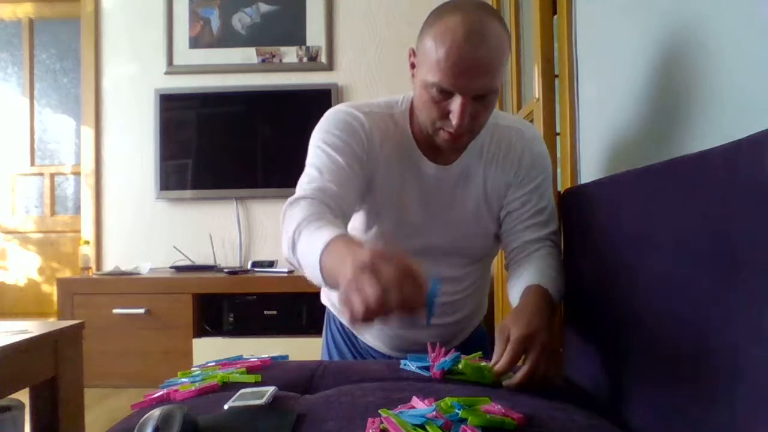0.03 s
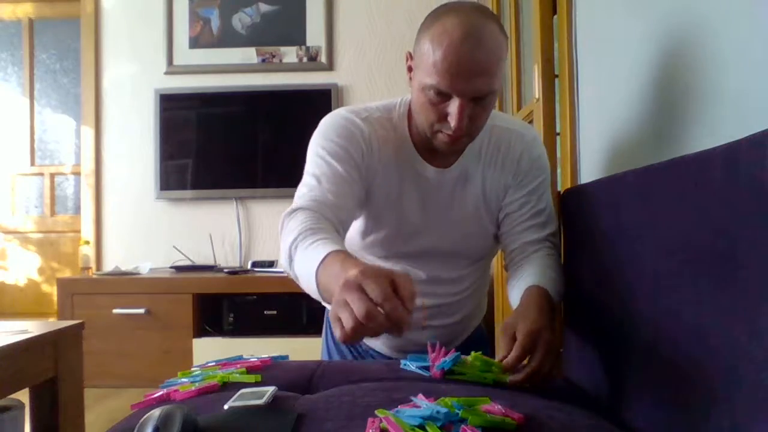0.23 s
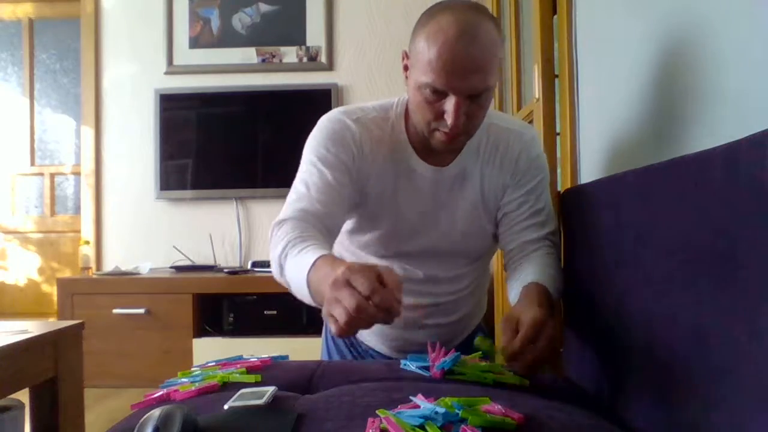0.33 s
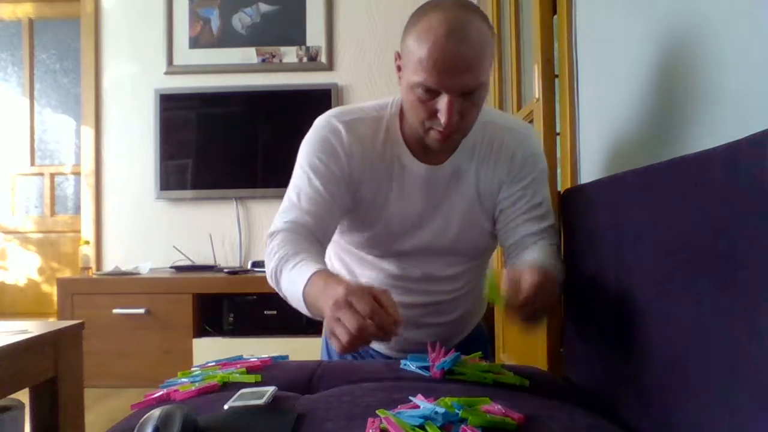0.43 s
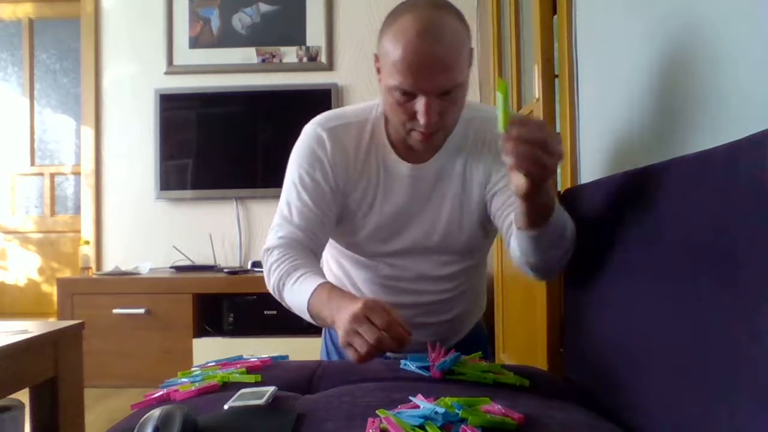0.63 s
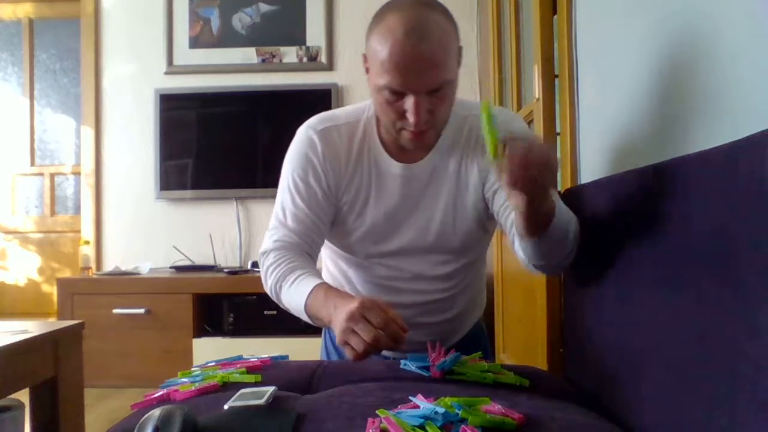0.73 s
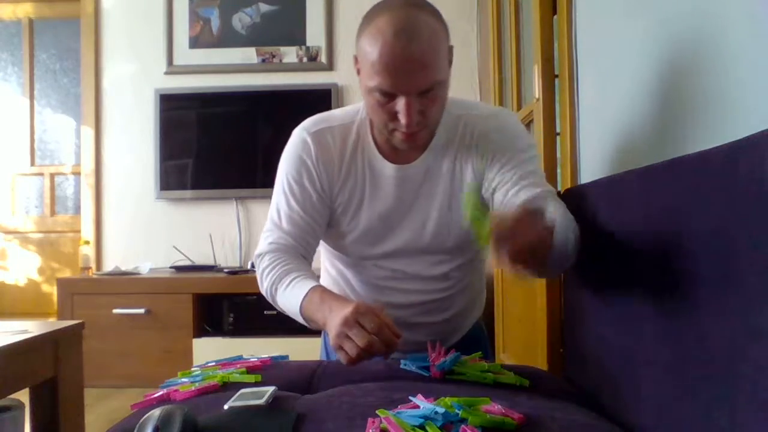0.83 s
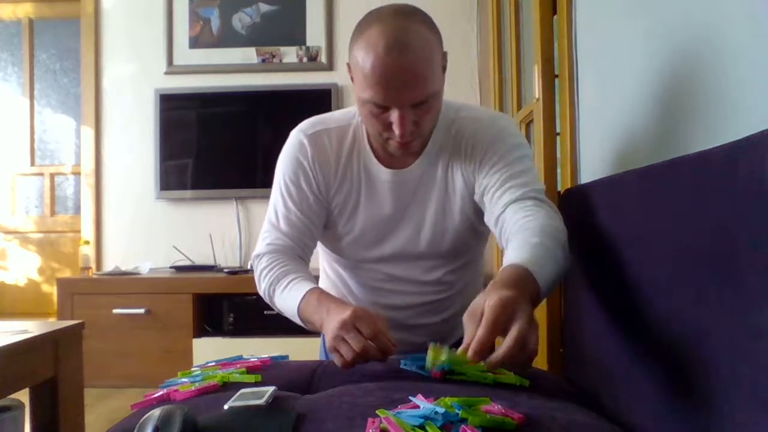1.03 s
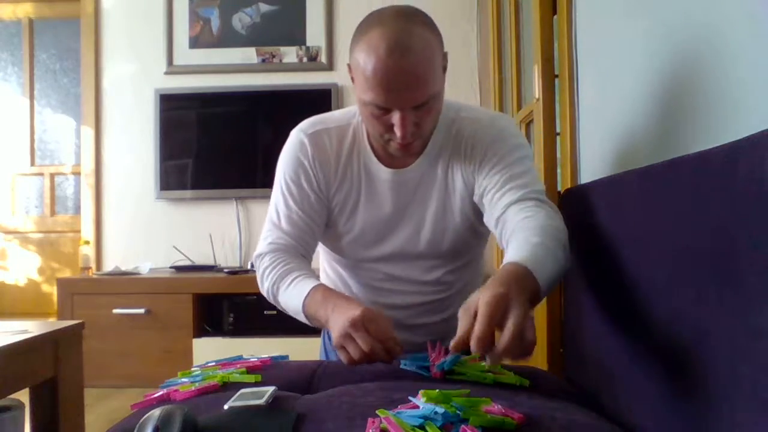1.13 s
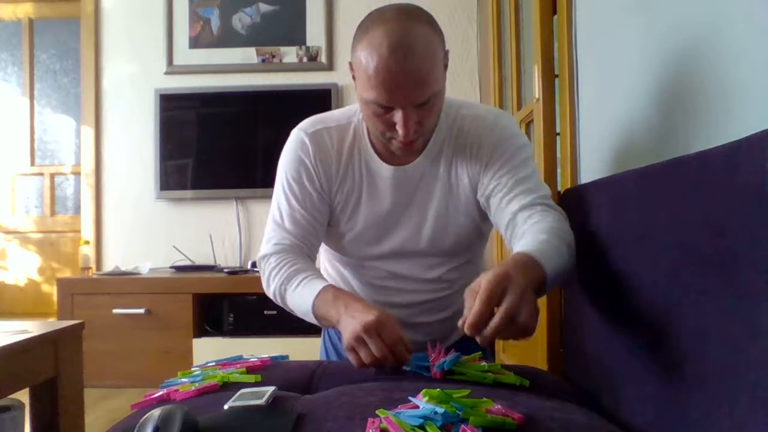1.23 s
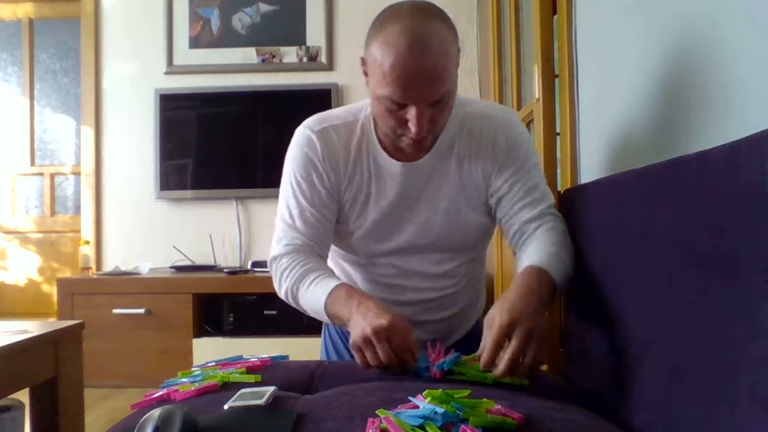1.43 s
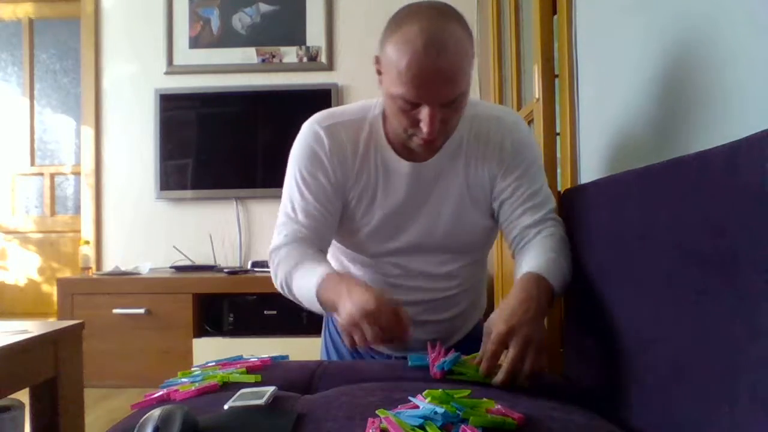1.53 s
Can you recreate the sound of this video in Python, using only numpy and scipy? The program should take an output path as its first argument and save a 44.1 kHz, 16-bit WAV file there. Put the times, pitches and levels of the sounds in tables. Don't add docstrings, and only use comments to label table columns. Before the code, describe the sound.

Plastic clothespins are put down on a pile on a sofa. A very faint scrape at 0.15 s leads to a sharp, dense rattle of clicks at 0.23-0.27 s with a dull cushion thump. Faint ticks follow near 0.7 s, with barely audible bird whistles. A second, lighter clatter comes at 1.16-1.2 s, then soft cloth rustle. Small live room, low hiss and fluttering electrical hum throughout.

```python
import sys
import numpy as np
from scipy import signal
from scipy.fft import rfft, irfft, next_fast_len
from scipy.io import wavfile
from scipy.ndimage import uniform_filter1d, map_coordinates

SR = 44100
rng = np.random.default_rng(int(sys.argv[2]) if len(sys.argv) > 2 else 0)


def generate_wav(sig):
    pcm = np.round(np.clip(np.atleast_2d(sig).T, -1, 1) * 32767).astype(np.int16)
    wavfile.write(sys.argv[1], SR, pcm)


def magnitude_from_level(level_db):
    exponent = np.asarray(level_db, float) / 20
    return 10 ** exponent


N = 70560
TIME_S = np.arange(N) / SR


def unit(x):
    return x / np.sqrt(np.mean(x ** 2) + 1e-20)


def along(points, hz):
    f, value = np.transpose(points)
    return np.interp(np.log(hz + 1), np.log(f + 1), value)


def wobble(rate_hz):
    return map_coordinates(rng.standard_normal(400), [TIME_S * rate_hz])


def filtered(x, response):
    size = next_fast_len(N + SR // 2)
    hz = np.fft.rfftfreq(size, 1 / SR)
    return irfft(rfft(x, size) * response(hz), size)[..., :N]


def resonance(f, centre_hz, width_hz):
    damping = 1j * f * width_hz
    return damping / (centre_hz ** 2 - f ** 2 + damping)


def rings(rows, attack_s):
    out = np.zeros(N)
    for start_s, db, hz, t60_s in rows:
        ago = np.maximum(TIME_S - start_s, 0)
        envelope = magnitude_from_level(db - 60 * ago / t60_s) * (1 - np.exp(-ago / attack_s))
        out += envelope * np.sin(2 * np.pi * hz * (TIME_S - start_s))
    return out


# t/s, peak level/dB, f/Hz, t60/s
CONTACTS = [(.1395, -58, 2800, .003), (.2346, -21, 4600, .004), (.2351, -15, 7000, .005),
            (.2370, -29, 3500, .005), (.2456, -17, 6300, .004), (.2474, -23, 3700, .004),
            (.2502, -25, 6000, .004), (.2528, -24, 7000, .009), (.2553, -27, 2700, .004),
            (.2565, -17, 6800, .006), (.2568, -21, 4800, .004), (.2593, -22, 5500, .004),
            (.2635, -29, 4500, .004), (.2683, -25, 3600, .004), (1.1632, -17, 5800, .004),
            (1.1662, -27, 7000, .005), (1.1701, -32, 5500, .003), (1.1746, -29, 4800, .006),
            (1.1783, -17, 7250, .004), (1.1786, -27, 2100, .004), (1.1793, -18, 6200, .004),
            (1.1815, -27, 7100, .005), (1.1828, -25, 6500, .003), (1.1854, -27, 5000, .003),
            (1.1870, -26, 7200, .003), (1.1907, -28, 3700, .004), (1.1968, -31, 7200, .008),
            (1.2010, -32, 5500, .006), (1.2053, -31, 7000, .005), (1.5440, -66, 3300, .006)]
# f/Hz, level/dB
CRACK_COLOUR = [(600, -26), (1200, -20), (1800, -18), (2700, -9), (4800, -3), (7300, 2), (9000, -20)]


def clicks():
    rise_s, crack_t60_s = .0004, .004
    crack_db, snap_db, total_db = -3, -1, 7.5
    burst, snaps = np.zeros(N), np.zeros(N)
    for start_s, db, _, _ in CONTACTS:
        ago = np.maximum(TIME_S - start_s, 0)
        burst += magnitude_from_level(crack_db + db - 60 * ago / crack_t60_s) * (1 - np.exp(-ago / rise_s))
        snaps[round((start_s + rise_s) * SR)] += magnitude_from_level(snap_db + db)
    rough = burst * np.sign(rng.standard_normal(N))
    crack = filtered(snaps + rough, lambda hz: magnitude_from_level(along(CRACK_COLOUR, hz)))
    return magnitude_from_level(total_db) * (rings(CONTACTS, rise_s) + crack)


# t/s, level/dB, f/Hz, t60/s
PILE_THUMPS = [
    (.235, -35, 1162, .02),
    (.243, -23.5, 364.6, 0.022),
    (.243, -27.5, 96.2, 0.071),
    (.256, -19, 1150, 0.0067),
    (.258, -37, 286, 0.099),
    (.264, -30, 87.5, .1),
    (1.164, -32.5, 1198, 0.017),
    (1.164, -46, 393, 0.018),
    (1.177, -29.5, 303, .03),
    (1.197, -42.5, 217.7, 0.089),
]


def thumps():
    return filtered(rings(PILE_THUMPS, attack_s=.002), lambda hz: hz ** 2 / (hz ** 2 + 60 ** 2))


# f/Hz, width/Hz, level/dB
PIN_MODES = [(1870, 100, -13), (2680, 110, 2), (3650, 450, -9), (5120, 400, -10), (6500, 700, -11)]


def scrape():
    start_s, attack_s, hold_s, release_s = .148, .016, .028, .02
    level_db = -56
    corners_s = np.cumsum([start_s, attack_s, hold_s, release_s])
    stroke = np.interp(TIME_S, corners_s, [0, 1, 1, 0])

    def pin(f):
        return sum(magnitude_from_level(db) * resonance(f, hz, width_hz) ** 2 for hz, width_hz, db in PIN_MODES)

    slips = unit(filtered(rng.standard_normal(N), pin))
    return magnitude_from_level(level_db) * stroke ** 2 * slips


# t/s, level/dB, f/Hz, t60/s
FAR_TICKS = [
    (.6748, -43, 4350, .008),
    (.6755, -62, 5900, .006),
    (.6860, -60, 4150, .010),
    (.6960, -58, 4600, .008),
    (.934, -62, 4200, .008),
    (.956, -65, 4800, .008),
]


def ticks():
    return rings(FAR_TICKS, attack_s=.0006)


# t/s, length/s, level/dB, f/Hz, rise/(Hz/s)
WHISTLES = [
    (.42, .1, -76, 6050, 0),
    (.683, .05, -76, 5880, 100),
    (1.05, .09, -72, 5540, 3200),
]


def birds():
    flutter_db, flutter_hz = 4, 200
    out = np.zeros(N)
    for start_s, length_s, db, hz, rise in WHISTLES:
        ago = TIME_S - start_s
        phase = 2 * np.pi * (hz * ago + rise * ago ** 2 / 2) + .6 * wobble(120)
        swell = np.sin(np.pi * np.clip(ago / length_s, 0, 1) ** .45)
        flutter = magnitude_from_level(db + flutter_db * wobble(flutter_hz))
        out += flutter * swell * np.sin(phase)
    return out


# t/s, length/s, level/dB, f/Hz, width/Hz
SOFT_RUSTLES = [
    (-.1, 0.77, -75.5, 850, 30),
    (.13, 0.057, -74.5, 500, 47),
    (.3, 0.17, -69.5, 500, 36),
    (.68, 0.21, -75.5, 1200, 150),
    (1.193, 0.18, -66.5, 470, 85),
    (1.42, .2, -70.5, 875, 13),
    (1.5, 0.26, -70.5, 1900, 370),
    (1.511, 0.08, -69, 454, 27),
    (-1.3, 9.6, -93, 3200, 46),
    (.2, 2.62, -78.5, 870, 63),
]


def rustles():
    out = np.zeros(N)
    for start_s, length_s, db, hz, width_hz in SOFT_RUSTLES:
        swell = np.sin(np.pi * np.clip((TIME_S - start_s) / length_s, 0, 1))
        noise = filtered(rng.standard_normal(N), lambda f: resonance(f, hz, width_hz))
        out += magnitude_from_level(db) * swell * unit(noise)
    return out


# f/Hz, t60/s
ROOM_T60 = [(100, .2), (400, .25), (1500, .36), (4000, .36), (7500, .35)]
# f/Hz, level/dB
TAIL_COLOUR = [(100, -2), (1500, 1.5), (4000, 0.5), (7500, -7)]


def room(x):
    gap_s = .008
    hz, t, z = signal.stft(rng.standard_normal(SR // 2), SR, nperseg=256)
    decay_db = along(TAIL_COLOUR, hz)[:, None] - 60 * t / along(ROOM_T60, hz)[:, None]
    tail = signal.istft(z * magnitude_from_level(decay_db), SR, nperseg=256)[1]
    tail = tail * (1 - np.exp(-np.arange(len(tail)) / SR / gap_s))
    return signal.fftconvolve(x, tail / np.linalg.norm(tail))[:N]


# f/Hz, density/dB
FLOOR_COLOUR = [(25, -10.5), (50, 3), (130, -6), (280, -8.5), (600, -21), (1200, -21), (2500, -28.5),
                (7600, -33)]


def floor():
    level_db, patch_db = -66, .8
    z = signal.stft(rng.standard_normal(N + 512), nperseg=512)[2]
    patches = uniform_filter1d(uniform_filter1d(rng.standard_normal(z.shape), 5, 0), 14, 1)
    hiss = signal.istft(z * magnitude_from_level(patch_db * unit(patches)), nperseg=512)[1][:N]
    coloured = filtered(hiss, lambda hz: magnitude_from_level(along(FLOOR_COLOUR, hz)) * (hz > 30))
    return magnitude_from_level(level_db) * unit(coloured)


def frame_thump():
    frame_hz, first_s, level_db, scatter_db = 30, .0003, -56.8, .6
    coupling_hz, coupling_width_hz, smooth_hz, block_hz = 68.4, 33.9, 63.6, 116
    lead_s, lead_share = -.0008, .63
    steps = np.zeros(N + SR // 4)
    at = np.round((first_s + np.arange(55) / frame_hz) * SR).astype(int)
    steps[at] = magnitude_from_level(scatter_db * rng.standard_normal(len(at)))
    f = np.fft.rfftfreq(len(steps), 1 / SR)
    drop = 1j * f / (coupling_hz ** 2 - f * f + 1j * f * coupling_width_hz) / (1 + 1j * f / smooth_hz) ** 2
    swell = lead_share * np.exp(2j * np.pi * f * lead_s) / (1 + (f / smooth_hz) ** 2) / smooth_hz
    advance = np.exp(2j * np.pi * f * 7 / frame_hz)
    block = 1j * f / (block_hz + 1j * f)
    train = irfft(rfft(steps) * (swell - drop) * advance * block, len(steps))[:N]
    return magnitude_from_level(level_db) * unit(train)


def scene():
    near = clicks() + thumps() + scrape()
    far = ticks() + birds()
    first_pin = TIME_S < .6
    near_wet = room(near * first_pin) + room(near * ~first_pin)
    wet = magnitude_from_level(-4) * near_wet + magnitude_from_level(-6) * room(far)
    return (near + far + wet + rustles() + floor() + frame_thump())[None]


def roll_off(x):
    return signal.sosfilt(signal.butter(12, 8460, fs=SR, output="sos"), x)


# f/Hz, level/dB
BAND_EDGE = [(7330, 0), (7480, -11), (7620, -35), (7760, -80)]


def record(dry):
    skirt_db, dither_db = 8, -99
    kept = filtered(dry, lambda hz: magnitude_from_level(along(BAND_EDGE, hz)))
    skirt = filtered(kept ** 3, lambda hz: (hz > 7550) & (hz < 8250))
    dither = magnitude_from_level(dither_db) * rng.standard_normal(dry.shape)
    return roll_off(kept + magnitude_from_level(skirt_db) * skirt + dither)


dry = scene()
out = record(dry)
generate_wav(out)
```